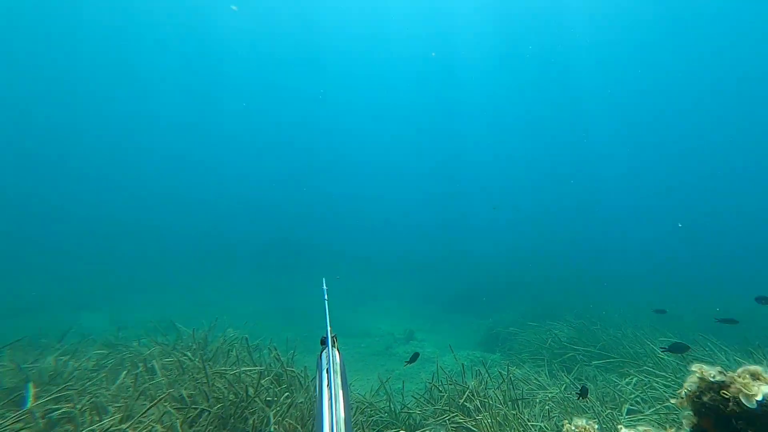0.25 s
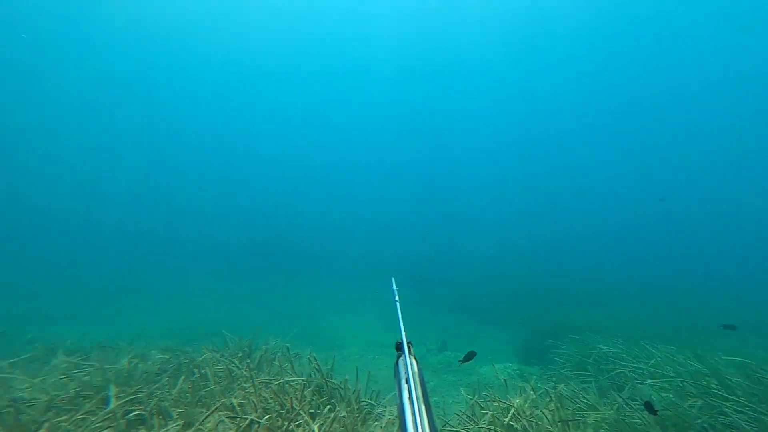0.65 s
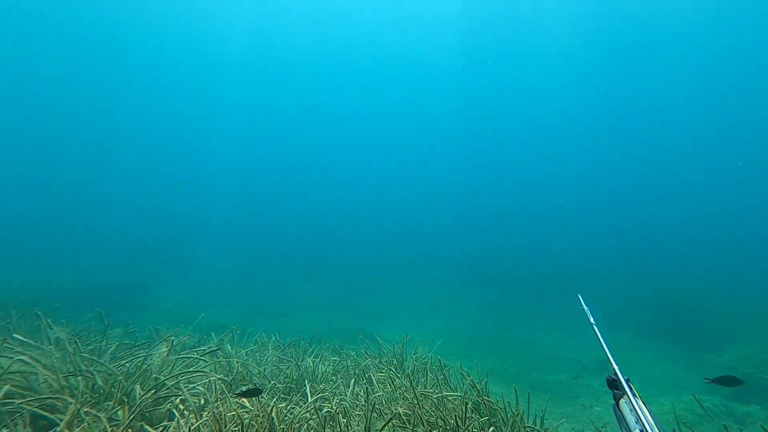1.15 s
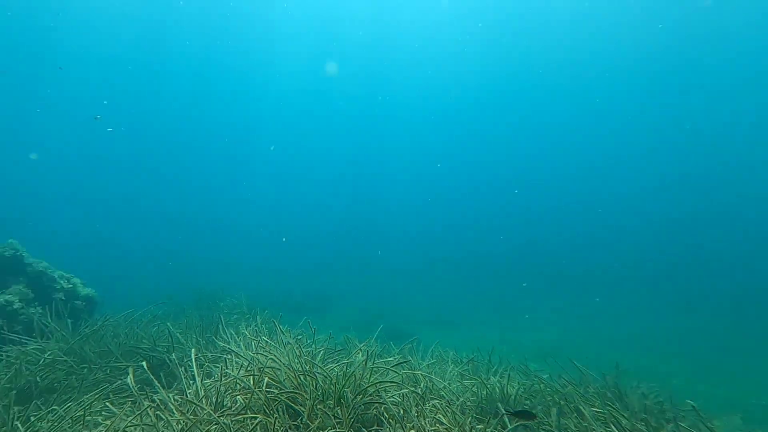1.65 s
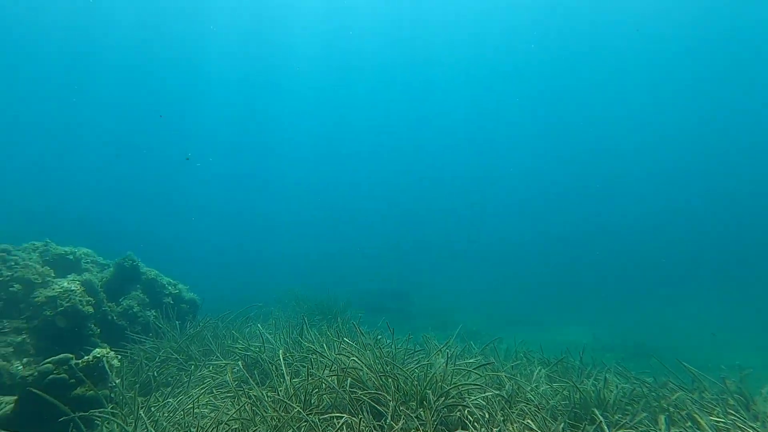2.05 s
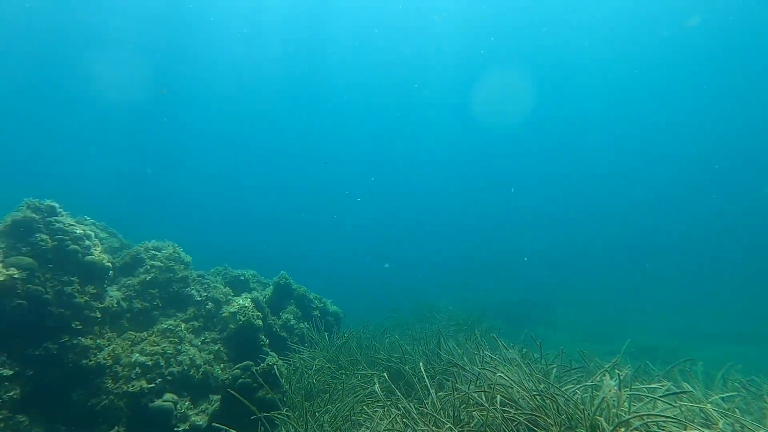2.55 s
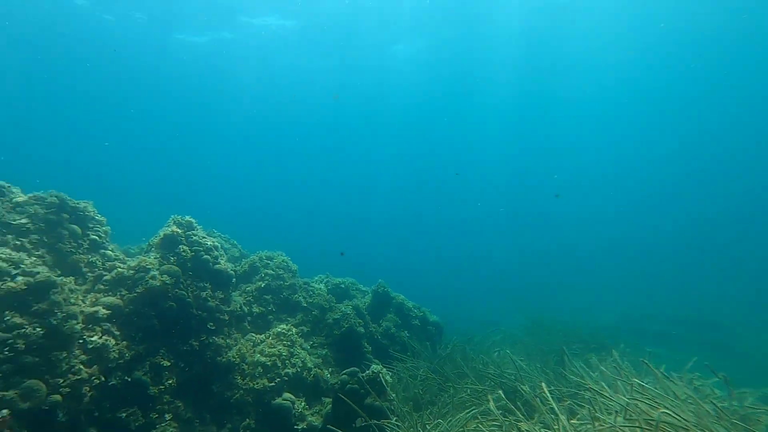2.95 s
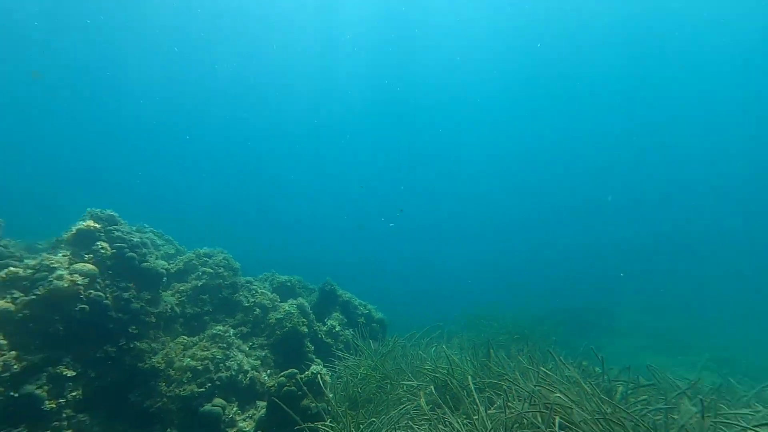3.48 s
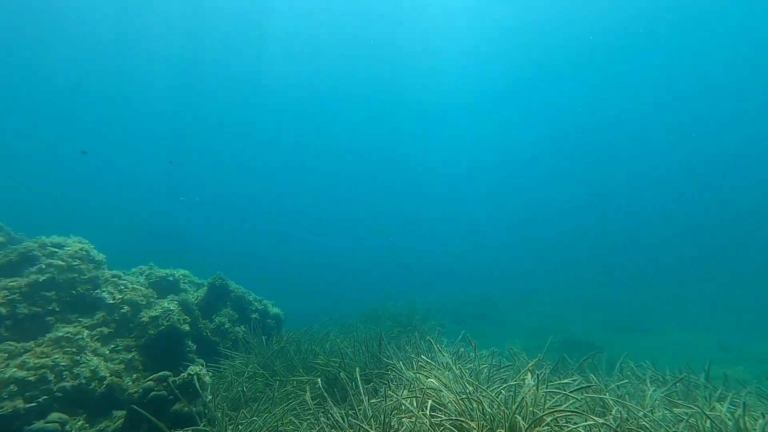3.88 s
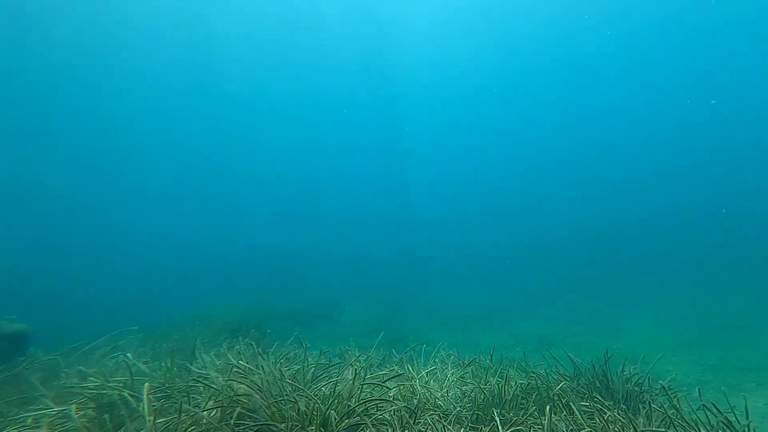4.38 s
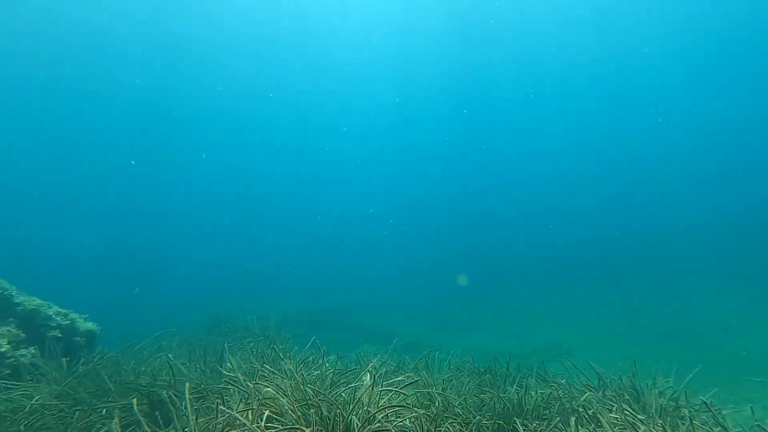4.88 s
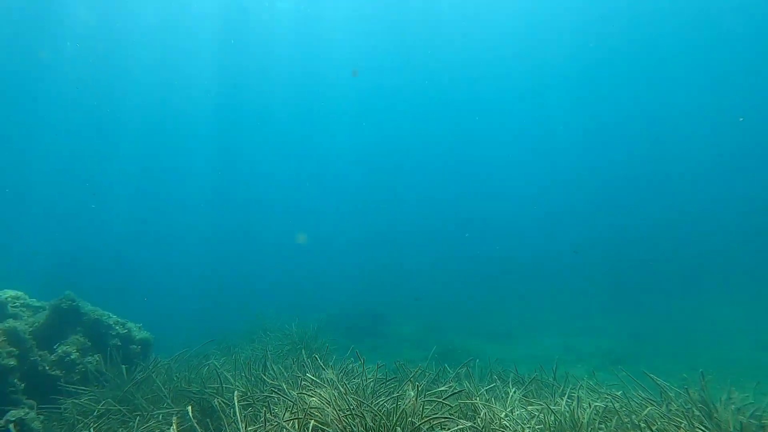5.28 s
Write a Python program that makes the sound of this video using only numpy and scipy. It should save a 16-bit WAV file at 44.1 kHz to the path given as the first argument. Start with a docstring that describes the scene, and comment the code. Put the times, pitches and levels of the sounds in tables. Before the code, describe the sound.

Heard from inside a plastic housing underwater, a low, lumpy rumble runs under fine crackling and hollow clicks. Several crisp pops hit the right side, then comes a rattling knock and a soft bubbling. Later, four thudding, clattering bumps arrive in quick succession with deep surges of water and muffled pops. Thin bubble fizz and a few ticks remain.

```python
"""A camera in a sealed plastic case rides on a free diver's head over sea grass. From the start the water
sways and rumbles, and reef crackle and small taps ring in the case. After a second the head turns, and the
membranes over the two microphone ports snap, often only the right one. Near 2.7 s a jolt rattles the strap
and sets the body thudding; bubbles fizz and gurgle past. From 3.9 s four more jolts follow with heaves of
water and mostly dull snaps in both ports, and the scene ends in fizz and light taps."""
import sys
import numpy as np
from scipy import signal
from scipy.fft import rfft, irfft
from scipy.io import wavfile

SR = 44100
rng = np.random.default_rng(int(sys.argv[2]) if len(sys.argv) > 2 else 0)


def log_audio(samples):
    """Write samples as a 16-bit WAV file to the path given in sys.argv[1]."""
    # one column per channel
    frames = np.atleast_2d(samples).T
    # limit to full scale, then quantise
    limited = np.clip(frames, -1, 1)
    pcm = np.round(limited * 32767).astype(np.int16)
    wavfile.write(sys.argv[1], SR, pcm)


N = 243873

# The two ports hear less alike as the head turns.
# Each row: time in seconds, left minus right in dB, gain of the unshared sound in dB.
HEAD_TURN = [(0, -2, -62), (.78, -2, -62), (.9, -1.5, -36), (1.2, 0, -19), (1.8, 1, -9.5), (2.4, 1, -6),
             (2.75, 0, -27), (3.0, -1.5, -59), (4.03, -2, -54), (4.12, -1.5, -54), (4.6, -0.5, -31),
             (4.9, 1.5, -29), (5.53, 1.5, -9.5)]
# Modes of the case wall. Each row: frequency in Hz, width of one filter stage in Hz, gain in dB,
# left minus right in dB.
WALL_MODES = [(690, 279, -17.5, 1.5), (1426, 234.5, -0.5, 2), (1884, 208, -14, -2),
              (2620, 1125, -14.5, 2.5), (3142, 630, -18, 1), (3614, 1200, -21, 4), (5360, 1300, -29, 3),
              (6800, 4500, -35.5, 6.5), (10100, 22000, -74, 39), (13300, 23000, -50, 27)]


def from_db(db):
    return 10 ** (np.asarray(db) / 20)


def unit_rms(x):
    return x / np.sqrt(np.mean(x ** 2) + 1e-20)


def curves(rows):
    """Linear interpolation of each column to every sample; the first column is time in seconds."""
    times, *columns = np.transpose(rows)
    return [np.interp(np.arange(N) / SR, times, column) for column in columns]


def side_gains(balance_db):
    """A level difference as left and right gains; the louder side stays at one."""
    return from_db([np.minimum(balance_db, 0), np.minimum(-balance_db, 0)])


def drift(rate_hz):
    """Slow random fluctuation: noise at every 40th sample through a double low-pass, rms 1."""
    pole = np.exp(-80 * np.pi * rate_hz / SR)
    noise = rng.standard_normal(N // 40 + 2002)
    slow = signal.lfilter([1], [1, -2 * pole, pole * pole], noise)[2000:]
    return np.interp(np.arange(N) / 40, np.arange(len(slow)), unit_rms(slow))


def biquad(x, kind, hz, q):
    """Second-order low-pass, high-pass, band-pass or all-pass."""
    w = 2 * np.pi * hz / SR
    a, c = np.sin(w) / (2 * q), np.cos(w)
    poles = [1 + a, -2 * c, 1 - a]
    zeros = {"low": [(1 - c) / 2, 1 - c, (1 - c) / 2], "high": [(1 + c) / 2, -1 - c, (1 + c) / 2],
             "band": [a, 0, -a], "all": poles[::-1]}[kind]
    return signal.lfilter(zeros, poles, x + 1e-18)


def resonance(x, hz, q):
    """Two equal band-passes in cascade give a resonance with steep skirts."""
    return biquad(biquad(x, "band", hz, q), "band", hz, q)


def ring(impulses, hz, t60_s):
    """Damped oscillator: a unit impulse starts a decaying sine of height 1."""
    r, w = from_db(-60 / (t60_s * SR)), 2 * np.pi * hz / SR
    return signal.lfilter([0, np.sin(w)], [1, -2 * r * np.cos(w), r * r], impulses + 1e-18)


def grains(per_s, spread_db, clump_db, tail_pole):
    """Shot noise: clumped, uneven impulses, each a decaying puff of noise; two independent rows, rms 1."""
    born = rng.random((2, N)) < per_s * from_db(clump_db * drift(25)) / SR
    sizes = from_db(spread_db * np.minimum(rng.exponential(1, (2, N)), 4)) * born
    envelope = signal.lfilter([1], [1, -tail_pole], sizes)
    return unit_rms(envelope * rng.standard_normal((2, N)))


def at_ports(pair):
    """Partial coherence: the shared row reaches the two ports in phase, the unshared row in antiphase."""
    shared, unshared = pair
    balance_db, unshared_db = curves(HEAD_TURN)
    return shared * side_gains(balance_db) + from_db(unshared_db) * unshared * [[1], [-1]]


def wall_mode(drive, k):
    """Forced response of one wall mode, left and right; neighbouring modes move in opposite phase."""
    hz, width_hz, db, balance_db = WALL_MODES[k]
    return (-1) ** k * from_db(db) * side_gains(balance_db)[:, None] * resonance(drive, hz, hz / width_hz)


def port_hiss():
    """Incoherent noise: each port has a faint, high, prickly hiss of its own."""
    prickle = grains(per_s=690, spread_db=6, clump_db=7, tail_pole=0.61)
    prickle += from_db(-6) * rng.standard_normal((2, N))
    return from_db(-76.5) * biquad(biquad(prickle, "band", 12000, 4.2), "band", 13200, 3.4)


def surge(level_db):
    """Swaying water makes slow pressure swings; each heave rises exponentially and falls more slowly."""
    # Heaves of the water. Each row: time of the crest in seconds, added amplitude in dB.
    heaves = [(0.858, -41.5), (2.262, -31), (2.711, -25.5), (3.341, -37), (3.91, -36), (4.282, -23.5),
              (5.05, -24)]
    rise_db_per_s, fall_db_per_s = 421.5, 215
    t = np.arange(N) / SR
    heaving = sum(from_db(db - np.where(t < s, rise_db_per_s * (s - t), fall_db_per_s * (t - s)))
                  for s, db in heaves)
    deep = biquad(biquad(rng.standard_normal((2, N)), "low", 37.5, 0.96), "low", 57, 0.23)
    return (from_db(level_db) + heaving) * unit_rms(biquad(deep, "high", 12.5, 0.38))


def rumble(level_db):
    """Water rumbles round the case: low coloured noise, made lumpy by random amplitude modulation."""
    # Spectrum of the rumble. Each row: frequency in Hz, relative spectral density in dB.
    spectrum = [(35, 4.5), (60, -7), (215, -7.5), (255, -21.5), (346, -19), (536, -36), (701, -35),
                (905, -36.5), (1100, -25.5), (1430, -57), (2420, -120)]
    corner_hz, density_db = np.transpose(spectrum)
    hz = np.maximum(np.arange(N // 2 + 1) * SR / N, 1)
    colour = from_db(np.interp(np.log(hz), np.log(corner_hz), density_db, -99, -99))
    noise = irfft(rfft(rng.standard_normal((2, N))) * colour, N)
    lumps = from_db(7 * np.clip(drift(15.7), -2, 1.5))
    return from_db(level_db) * unit_rms(noise * lumps)


def fizz(level_db):
    """Tiny bubbles burst near the ports: dense shot noise, heard as a fine bright sizzle."""
    bursts = grains(per_s=1900, spread_db=7, clump_db=4, tail_pole=0.62)
    band = signal.butter(3, [4300, 8200], "band", fs=SR, output="sos")
    return from_db(level_db - 12.5) * unit_rms(signal.sosfilt(band, bursts))


def gurgle():
    """Larger bubbles resonate lower: soft pops swell and fade once as they churn past."""
    middle_s, half_length_s = 3.07, 0.17
    pops = grains(per_s=200, spread_db=12, clump_db=5.5, tail_pole=0.995)
    swell = np.exp(-((np.arange(N) / SR - middle_s) / half_length_s) ** 2)
    return from_db(-58.5) * swell * unit_rms(resonance(pops, hz=377, q=1.3))


def reef_crackle(level_db):
    """Shot noise from the reef over a fluctuating hiss: a broadband drive for the case wall."""
    hiss = from_db(-7 + 3.63 * drift(24.8)) * rng.standard_normal((2, N))
    clicks = grains(per_s=300, spread_db=3, clump_db=4, tail_pole=0.99)
    return from_db(level_db + 15.5) * (clicks + hiss)


def strap_rattle():
    """Each jolt shakes the strap into a burst of dense, dull impacts that drive the case wall."""
    # Jolts of the case. Each entry: start in seconds.
    jolts = [2.676, 3.872, 4.254, 4.626, 4.981]
    length_s, top_hz = 0.1014, 3370
    t, shake = np.arange(N) / SR, 0
    for start_s in jolts:
        age = np.maximum(t - start_s, 0) / length_s
        attack = np.minimum(5 * age, 1) ** 2
        shake = shake + from_db(-6.5) * attack * np.exp(-4 * age ** 1.49)
    impacts = grains(per_s=730, spread_db=-5, clump_db=3, tail_pole=0.995)
    return signal.sosfilt(signal.butter(2, top_hz, fs=SR, output="sos"), shake * impacts)


def case_response(crackle, rattle):
    """Modal superposition: crackle and rattle drive the wall; water noise also rings the port cavity."""
    drive = at_ports(crackle + rattle)
    wall = sum(wall_mode(drive, k) for k in range(len(WALL_MODES)))
    hollow = from_db(7.5) * wall_mode(at_ports(rattle), 0)   # blows favour the deepest mode
    water_noise = crackle + from_db(-54) * rng.standard_normal((2, N))
    cavity = from_db(-23.5) * resonance(at_ports(water_noise), hz=5160, q=5.8)
    return wall + hollow + cavity


def case_taps():
    """Impact excitation: a puff of noise rings the wall modes and the latch; its treble is over sooner."""
    # Taps on the case. Each row: time in seconds, peak in dB before the head's turn, tilt in dB per
    # octave, lift of the deepest mode in dB, lift of the clacking mode in dB.
    taps = [(0.1422, -38, -20, 13, -10), (0.182, -32.5, -10, 6.5, 2.5), (0.4476, -30.5, -4.5, 2.5, -7),
            (0.4906, -40.5, 1, 9, 3), (.6245, -44, -4, -25, -10), (0.6804, -39.5, -24, -12, -19),
            (.853, -35, -7, -16, -13), (0.8823, -40.5, -20, 23, -19), (0.9726, -39.5, -8, -17, 12),
            (1.073, -40, 3.5, 7, -9), (1.2477, -29, -2, -26, -1), (1.266, -31.5, -3, -2, -4),
            (1.2836, -40, -2, -13, -9), (1.3432, -41.5, 3, -17, 11), (1.3912, -27.5, 0, -4, -2),
            (1.5339, -32, 5, -23, 7), (2.0832, -40, -7, -15, -9), (2.3291, -37, 6, -14, -10),
            (2.3394, -36.5, 5, 3, 1), (2.3623, -38.5, 1.5, -16, 3), (2.5438, -37.5, -4.5, -31, -7),
            (2.587, -41, 1, -16, 0.5), (2.6694, -42.5, 7, 16, 13.5), (2.697, -29, 4.5, -7, 13),
            (2.719, -20.5, 3.5, -12, 9.5), (2.7401, -37.5, 7.5, -7, 13), (2.9803, -43.5, 5.5, 5, -1),
            (3.0706, -36.5, 6, 6, 0), (3.284, -33, 1.5, -13, -2), (3.4332, -42, -1, -12, -9),
            (3.509, -41, -4.5, 1, -7), (3.7103, -38, 6.5, 8, 7.5), (3.7668, -46.5, -19, -1, -12),
            (3.8273, -32, -15, -12, -20), (3.8876, -22, 1, 32, .6), (3.919, -20, -4, -19, 2),
            (4.0744, -36.5, -6, -12, 1.5), (4.0827, -21.5, -23, -15, -4.5), (4.1999, -45, -0.5, 6, -19),
            (4.2697, -18.5, -33, 10.5, -26), (4.3056, -19.5, 1, 11, 8.5), (4.453, -36.5, -8, 3, -3),
            (4.4783, -40, 3.5, 13, -9), (4.6483, -17.5, 2.5, -23, 7.5), (4.6583, -19.5, 5.5, 2, -2),
            (4.6728, -8.5, 0, 7, 6), (4.7052, -30, 2, 4, 3), (4.7287, -32, -0.5, 7, 3),
            (4.8773, -39, -7, -26, -12), (4.993, -21.5, -2, 21.5, -4), (5.011, -25, 3.5, 2.5, 12.5),
            (5.0225, -20, 1.5, -19, 3), (5.1543, -36.5, 2.5, -17, -3), (5.3331, -36, 5.5, -19, -4),
            (5.3822, -37, 3, -15, -2.5), (5.4193, -28.5, -6.5, -15, -9)]
    puff_s, lead_s = 0.00722, 0.0015
    latch_hz, latch_q, latch_scatter = 2655, 52, 0.022
    scatter_db = rng.normal(0, 2, (len(taps), len(WALL_MODES)))
    noises = rng.standard_normal((len(taps), 3000))
    t = np.arange(noises.shape[1]) / SR
    octaves = np.log2(np.array(WALL_MODES)[:, 0] / WALL_MODES[1][0])
    out = np.zeros((2, N))
    for (s, peak_db, tilt_db, hollow_db, clack_db), noise, chance_db in zip(taps, noises, scatter_db):
        lift_db = tilt_db * octaves + chance_db
        lift_db[0], lift_db[3] = hollow_db, clack_db
        tap = 0
        for k, octave in enumerate(octaves):
            haste = 1.305 ** max(octave, 0)
            age = t / puff_s * haste
            puff = noise * age * np.exp(-3 * age)
            tap = tap + from_db(lift_db[k]) * np.sqrt(haste) * wall_mode(puff, k)
        # The last, shortest puff rings the metal latch, at a slightly different pitch each tap.
        latch = biquad(puff, "band", latch_hz * (1 + latch_scatter * noise[-1]), latch_q)
        tap = tap + from_db(clack_db - 2) * latch
        start = round((s - lead_s) * SR)
        out[:, start:start + len(t)] += from_db(peak_db) / np.abs(tap).max() * tap[:, :N - start]
    balance_db, _ = curves(HEAD_TURN)
    return out * side_gains(balance_db)


def body_knocks():
    """Damped free vibration: soft blows ring the low modes of the body and rock it on its strap."""
    # Knocks on the case. Each row: start in seconds, relative thud level in dB, sway level in dB.
    knocks = [(0.636, -31.5, -66), (0.691, -38.5, -31.5), (0.798, -40, -30), (2.6867, -22, -53),
              (2.693, -10.5, -50), (2.700, -9, -17), (3.887, -13.5, -40), (3.8954, -7.5, -9),
              (3.904, -20, -34), (4.269, -15.5, -16), (4.2778, -7.5, -12), (4.289, -14, -12),
              (4.33, -33, -20.5), (4.640, -17.5, -45), (4.675, -12.5, -18), (4.718, -23.5, -33),
              (4.9963, -16, -8.5), (5.009, -11, -13.5), (5.058, -24, -14.5), (5.093, -45, -24)]
    # Modes of the body. Each row: frequency in Hz, gain in dB, time to decay by 60 dB in seconds.
    body_modes = [(152.6, 6.5, 0.12), (207, 1, 0.098), (330.3, -9, 0.12), (598, -15, 0.05)]
    start_s, thud_db, sway_db = np.transpose(knocks)
    starts = np.round(start_s * SR).astype(int)
    blows, shoves = np.zeros((2, N))
    blows[starts], shoves[starts] = -from_db(thud_db - 12), -from_db(sway_db)   # inward push first
    thud = sum(from_db(db) * ring(blows, hz, t60_s) for hz, db, t60_s in body_modes)
    sway = ring(shoves, hz=46, t60_s=0.086)
    return biquad(thud + sway, "low", 1660, 0.18)


def membrane_snaps():
    """Step response: a membrane gives way, and the rounded pressure step leaks off through the port."""
    # Snaps of the membranes. Each row: start in seconds, pressure step in dB, kind.
    snaps = [(0.7258, -35.5, "soft"), (1.0693, -26.5, "right"), (1.2321, -22, "right"),
             (1.285, -29, "right"), (1.346, -29, "right"), (1.4323, -12.5, "right"), (1.4616, -33, "soft"),
             (1.6094, -27, "right"), (1.6252, -15.5, "right"), (1.7236, -36, "soft"), (1.7676, -29, "both"),
             (1.8747, -22.5, "both"), (1.8929, -27, "right"), (1.9964, -2.5, "right"),
             (2.2559, 0.5, "right"), (2.3177, -36, "soft"), (2.9948, -34, "soft"), (3.59, -31.5, "soft"),
             (4.1285, -29, "dull"), (4.2762, -19, "dull"), (4.4016, -36.5, "soft"), (4.6446, 2, "dull"),
             (4.6505, -1, "dull"), (4.6932, -18.5, "dull"), (4.7595, -5.5, "both"), (4.8161, -29.5, "soft"),
             (4.9977, -8, "dull"), (5.0166, -11.5, "dull")]
    # Kinds of snap: "right" in one port; "both", "soft" and "dull" in both, each duller than the last.
    # Each entry: left minus right in dB, cutoff of the edge in Hz.
    snap_kinds = {"right": (-51, 3860), "both": (-0.052, 5500), "soft": (.3, 2200), "dull": (0.73, 580)}
    out = np.zeros((2, N))
    for start_s, step_db, kind in snaps:
        balance_db, edge_hz = snap_kinds[kind]
        start = round(start_s * SR)
        step = biquad(-np.ones(min(8000, N - start)), "low", edge_hz, 0.37)
        pulse = biquad(biquad(step, "high", 78, 0.79), "high", 18.8, 1.4)   # the leak is a high-pass
        out[:, start:start + len(pulse)] += from_db(step_db) * side_gains(balance_db)[:, None] * pulse
    return out


def scene():
    """Superposition at two ports: the sea, the ringing case, then taps, knocks and snaps on top."""
    # The steady sea. Each row: time in seconds, then relative levels in dB of surge, rumble, crackle, fizz.
    sea_levels = [(0, -40.5, -47.5, -50.5, -94), (.3, -55.5, -52, -57.5, -83),
                  (.7, -45.5, -57, -57.5, -100), (1.0, -48.5, -50.5, -50, -95),
                  (1.5, -48, -49.5, -52.5, -74), (2.0, -42, -53, -52.5, -63), (2.5, -51.5, -55.5, -58, -79),
                  (3.05, -42, -54.5, -52.5, -55), (3.5, -44.5, -53.5, -56.5, -77),
                  (4.1, -35.5, -53, -57.5, -95), (4.4, -47.5, -44.5, -52, -78),
                  (4.58, -43, -62.5, -56, -64.5), (4.8, -38.5, -36.5, -55, -63),
                  (4.95, -34.5, -59.5, -54.5, -65.5), (5.15, -39, -47.5, -54.5, -64),
                  (5.3, -45, -68.5, -54, -56.5), (5.53, -47, -50.5, -54.5, -65)]
    surge_db, rumble_db, crackle_db, fizz_db = curves(sea_levels)
    _, unshared_db = curves(HEAD_TURN)
    shared, unshared = surge(surge_db) + rumble(rumble_db)
    bass = shared + from_db(unshared_db - 9) * unshared * [[1], [-1]]   # long waves stay near the centre
    bubbles = at_ports(fizz(fizz_db) + gurgle())
    hiss = port_hiss()
    case = case_response(reef_crackle(crackle_db), strap_rattle())
    return hiss + bass + bubbles + case + case_taps() + body_knocks() + membrane_snaps()


def record(dry):
    """Group delay: the bass crossover turns the phase, so lows trail each click; the top is cut."""
    crossover_hz, cutoff_hz = 243, 16600
    turned = biquad(dry, "all", crossover_hz, 0.74)
    return signal.sosfilt(signal.cheby2(12, 60, cutoff_hz, fs=SR, output="sos"), turned)


dry = scene()
out = record(dry)
log_audio(out)
```